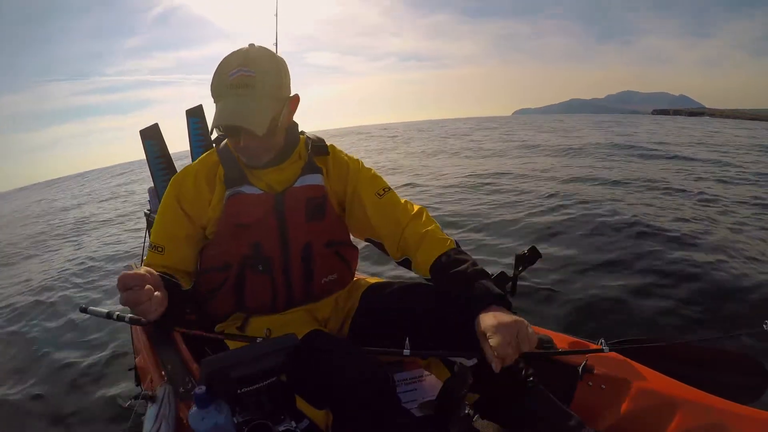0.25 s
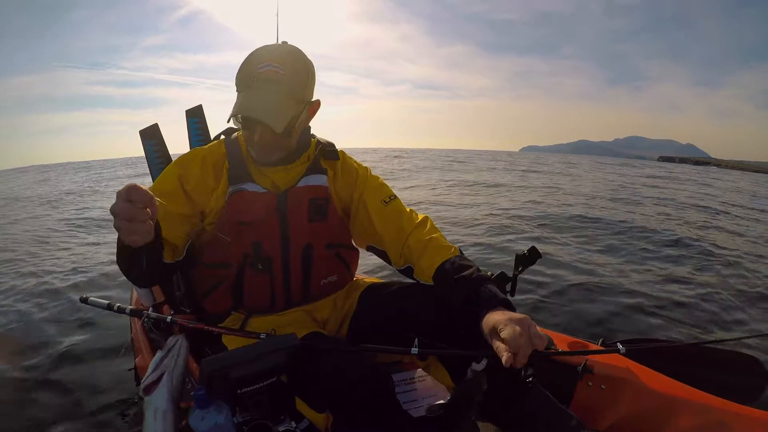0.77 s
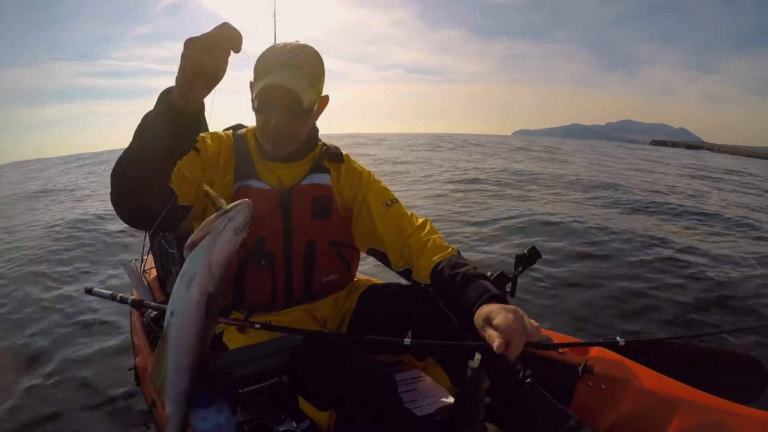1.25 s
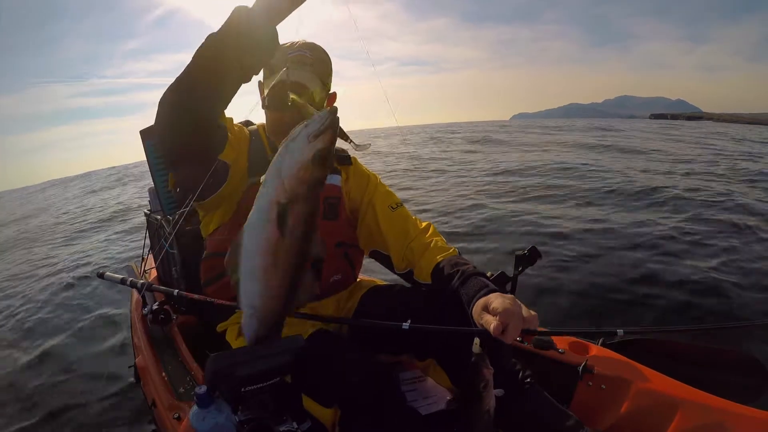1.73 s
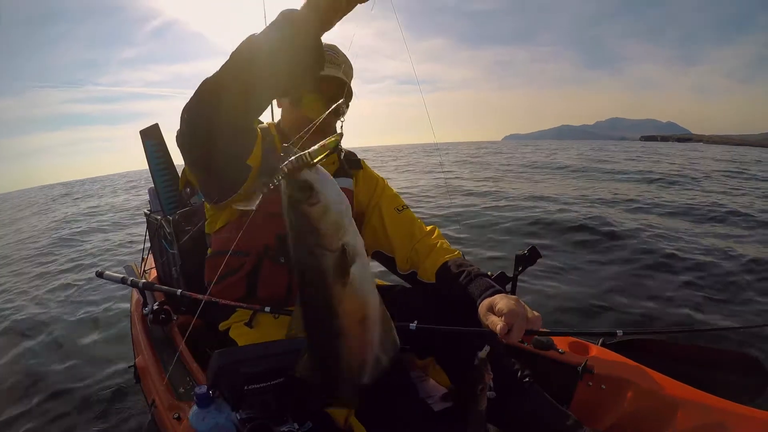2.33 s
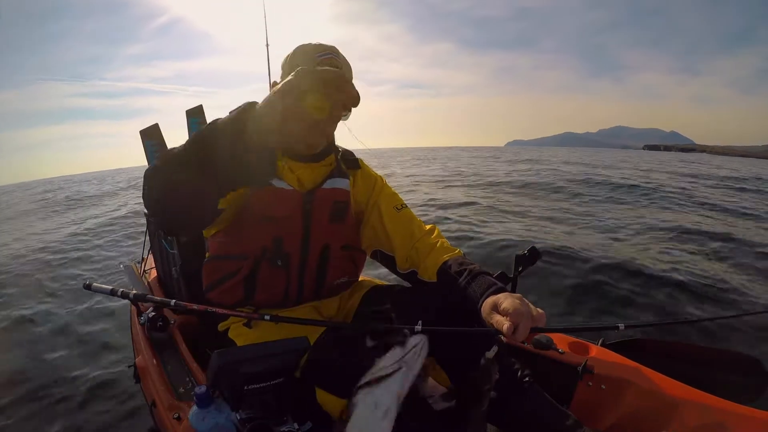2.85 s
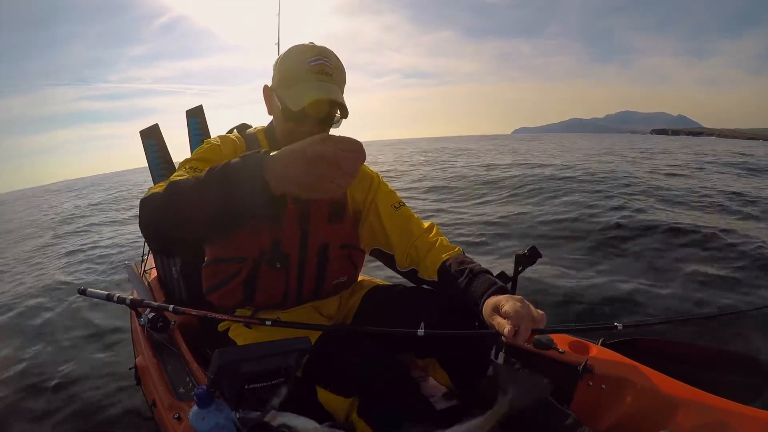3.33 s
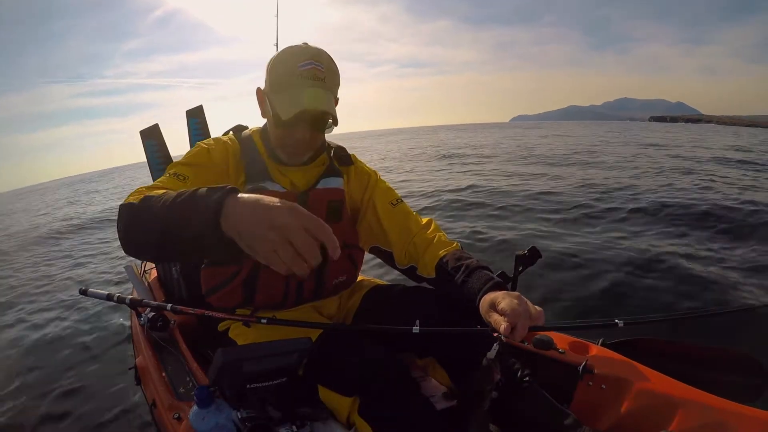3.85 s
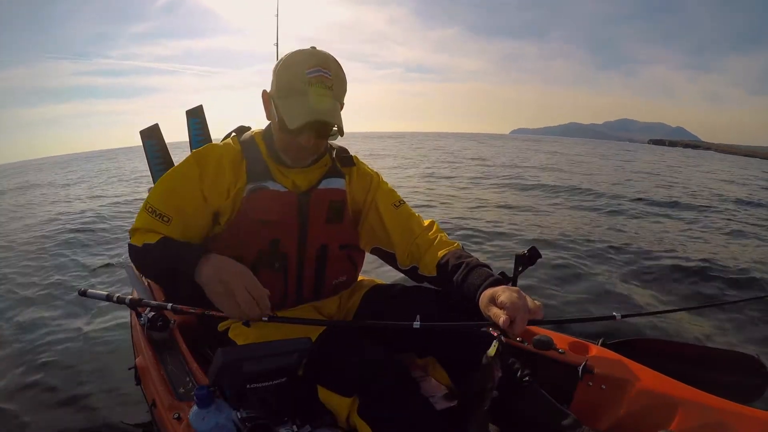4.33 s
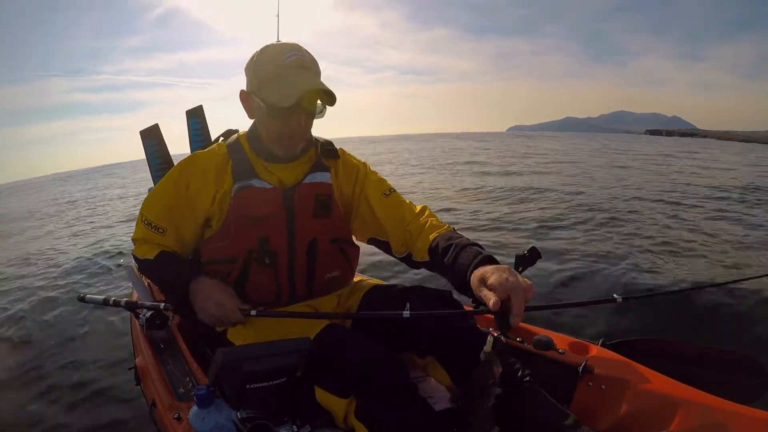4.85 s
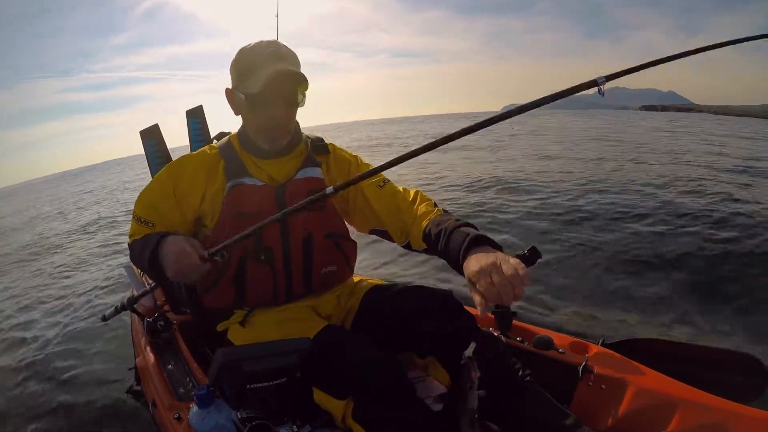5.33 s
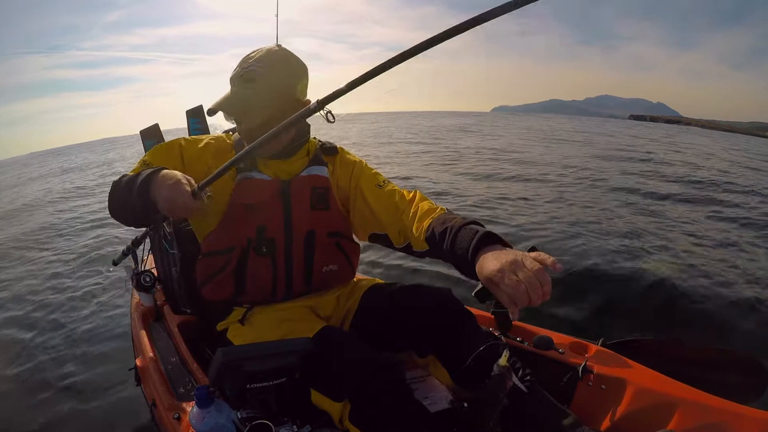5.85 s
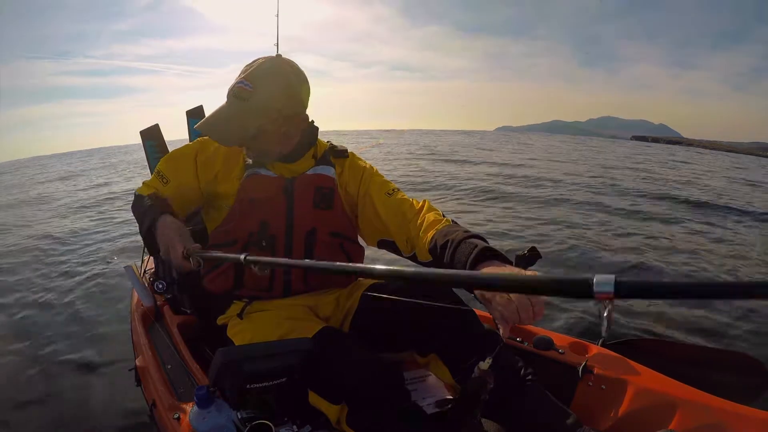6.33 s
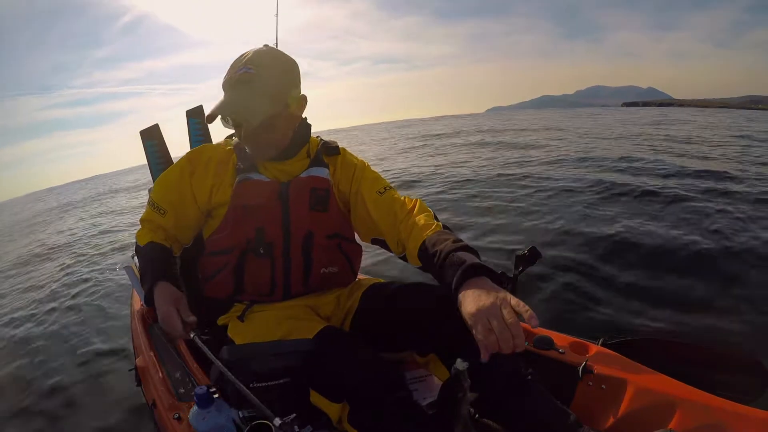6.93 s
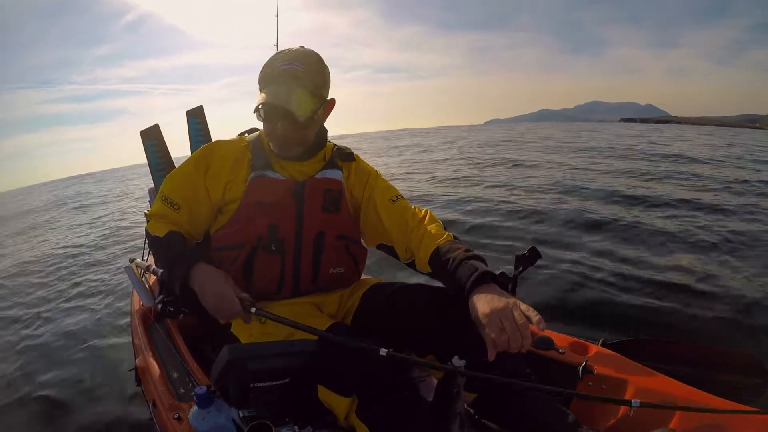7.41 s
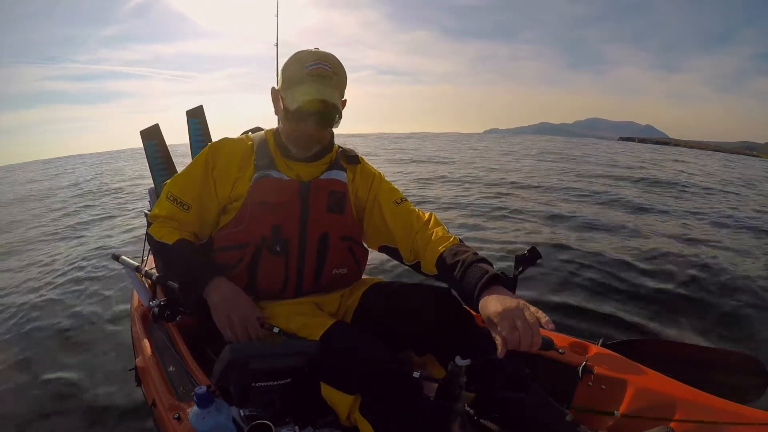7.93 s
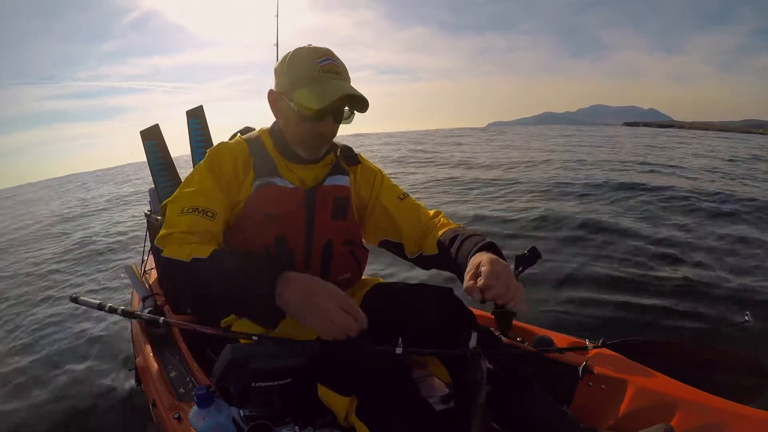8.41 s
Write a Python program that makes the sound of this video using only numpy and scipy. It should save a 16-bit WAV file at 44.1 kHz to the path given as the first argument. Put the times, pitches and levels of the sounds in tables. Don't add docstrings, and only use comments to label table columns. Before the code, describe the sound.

Hollow water slaps and low panel thumps dominate, heard through the boat's own body. Tiny metallic ticks, dry knocks and short scrapes come from handled tackle, with faint sleeve rustle. Activity is dense at first, sinks to soft gurgles near two seconds, bursts at about three, eases, then grows busy from five seconds to the end. Low swell rumble and thin steady hiss lie beneath.

```python
import sys
import numpy as np
from scipy import signal
from scipy.fft import rfft, irfft
from scipy.io import wavfile
from scipy.ndimage import uniform_filter1d, minimum_filter1d

SR = 44100
rng = np.random.default_rng(int(sys.argv[2]) if len(sys.argv) > 2 else 0)


def pcm_store(signal):
    levels = np.round(np.clip(np.atleast_2d(signal), -1, 1) * 32767)
    wavfile.write(sys.argv[1], SR, levels.astype(np.int16).T)


def attenuation_scalar(level_db):
    decades = np.asarray(level_db, float) / 20
    return 10 ** decades


N = 382347

# frequency in Hz, width in Hz, level in dB, left minus right in dB,
# lead of the right port in rad.
KEEL_MODES = [(30, 24, -15, 2, .4), (48.3, 11, -8, -3.5, 1.9), (62.8, 15, 2.5, -3, 0.94),
              (82.5, 25.5, -0.5, 2.5, 1.72)]
# frequency in Hz, width in Hz, level in dB, left minus right in dB,
# lead of the right port in rad.
HULL_MODES = [(139.5, 17, 5, 4.5, 1.92), (170, 27, -4.5, 5, 1.4), (207, 22.7, 3.5, 2, 2.15),
              (261, 21, 2.5, -1.5, 1.8), (308, 28.4, -7.5, -2, 1.33), (372.6, 41, -7.5, -6.5, 0.67),
              (432.7, 51, -8.5, 2.5, 0.51), (501, 30, -18, -7, 0.28)]
# frequency in Hz, width in Hz, level in dB, left minus right in dB,
# lead of the right port in rad.
DECK_MODES = [(577, 174, 3.5, -3.5, 1.71), (716, 77, -20.5, 6, -1.5), (1020, 170, 6, -0.5, -2.5),
              (1210, 85, -2, 4, -2.5), (1488, 220, -3, -1.5, -2), (1900, 167, -1.5, -1.5, 1.08),
              (2300, 390, -35, 2, -20)]
# frequency in Hz, width in Hz, level in dB, left minus right in dB,
# lead of the right port in rad.
TACKLE_MODES = [(3000, 5800, -1.5, -2, -0.5), (4100, 640, 0.5, -1, -8), (5000, 1020, 1.5, 0, -6),
                (6270, 610, 4.5, 8.5, 2), (7110, 440, -1.5, -15, -1), (8730, 3400, -3, -29.5, -3),
                (10400, 1600, -6, -42.5, -9), (12800, 2200, -19, 0, -7.5)]

# start in seconds, peak in dB, struck pitch in Hz.
SLAPS = [(0.443, -5, 271), (0.737, -26, 280), (0.788, -17, 201), (1.132, -16.5, 236), (1.419, -16.5, 280),
         (2.498, -21.5, 220), (2.75, -6, 250), (2.995, -20.5, 242), (3.397, -15.5, 294), (3.74, -21, 170),
         (3.743, -13.5, 280), (4.691, -19, 353), (5.829, -18.5, 297), (5.961, -9.5, 261),
         (6.246, -5.5, 287), (6.673, -10.5, 207), (6.911, -10, 273), (7.408, -17, 297), (7.651, -19, 188.5),
         (8.111, -12, 451), (8.332, -3.5, 380)]
# start in seconds, peak in dB, struck pitch in Hz.
SLOPS = [(1.312, -18.5, 340), (2.62, -18, 330), (2.7, -13.5, 303), (3.047, -11, 178), (4.03, -16.5, 329),
         (4.317, -17.5, 170), (5.125, -10, 248), (5.591, -12.5, 324), (5.745, -12.5, 260),
         (6.566, -13.5, 284), (6.837, -16, 224), (7.562, -17.5, 170), (7.797, -19, 187),
         (7.827, -11.5, 311)]
# start in seconds, peak in dB, struck pitch in Hz.
FLICKS = [
    (2.545, -15, 357),
    (2.924, -18.5, 199),
    (3.176, -9.5, 234),
    (3.211, -13, 290),
    (3.962, -22.5, 310),
    (4.516, -27.5, 358),
    (7.34, -22, 217),
    (8.31, -7.5, 300),
    (8.6, -13.5, 249),
]
# start in seconds, peak in dB, pitch in Hz.
THUMPS = [
    (2.754, -6.5, 252),
    (3.964, -21.5, 170),
    (5.744, -16, 258),
    (6.249, -9.5, 280),
    (6.672, -9, 209),
    (6.913, -7, 261),
    (7.562, -21, 170),
    (8.336, -6.5, 226),
]
# start in seconds, peak in dB, pitch in Hz.
CRACKS = [(.447, -13, 326), (.478, -17, 480), (1.137, -21, 596), (2.749, -10.5, 503), (3.1, -8, 567),
          (3.1, -5.5, 820), (8.331, -12, 950), (3.101, -8, 1540), (3.215, -9.5, 296), (3.4, -18.5, 465),
          (3.749, -11, 332), (6.911, -13, 550), (8.116, -14.5, 500), (8.332, -4.5, 538)]
# start in seconds, peak in dB, struck pitch in Hz.
LAPS = [(0.057, -9, 273.1), (0.168, -10.5, 253), (0.209, -11.5, 330), (0.244, -17, 281), (0.868, -37, 151),
        (1.344, -16, 267), (1.449, -20, 183), (1.577, -20.5, 231), (1.677, -20, 257), (1.754, -21, 246),
        (1.959, -21.5, 166), (2.074, -36.5, 207), (2.395, -45, 253), (2.846, -28, 166), (2.96, -28, 207),
        (3.634, -26.5, 183), (3.705, -19, 151), (3.846, -38, 355), (3.903, -38, 218), (4.178, -29.5, 336),
        (4.286, -20.5, 150), (4.862, -36, 190), (4.922, -27, 248), (5.179, -17, 153), (5.259, -22, 147),
        (5.309, -34, 151), (5.849, -22, 544), (6.079, -14.5, 189), (6.17, -14, 273), (6.299, -16, 149),
        (6.418, -11, 279), (7.205, -20.5, 207), (7.679, -23, 278), (7.969, -19, 393), (8.069, -39, 216),
        (8.209, -22, 450), (8.228, -23, 196), (8.429, -15.5, 212), (8.459, -17, 171), (8.509, -22, 170),
        (8.572, -21, 218)]
# start in seconds, peak in dB, struck pitch in Hz.
KNOCKS = [(0.472, -33, 930), (1.11, -34, 900), (1.92, -30.5, 1590), (3.399, -22, 643), (4.068, -14, 1490),
          (4.689, -21.5, 1125), (5.961, -29, 725), (6.148, -23.5, 1900), (6.168, -28.5, 1060),
          (6.168, -28.5, 1900), (6.911, -15, 760), (7.792, -16.5, 1820), (8.103, -19, 1030)]
# start in seconds, peak in dB, struck pitch in Hz.
RAPS = [(0.439, -27.5, 1000), (2.547, -25, 1160), (2.748, -15.5, 910), (2.919, -27, 1900),
        (3.056, -15.5, 1890), (3.523, -35.5, 2040), (3.939, -33, 1890), (5.845, -28, 780),
        (5.915, -21.5, 1690), (6.248, -12.5, 1150), (8.33, -10, 990), (8.599, -27, 667),
        (8.627, -25.5, 1105)]
# start in seconds, peak in dB, struck pitch in Hz.
BUMPS = [(0.046, -22, 846), (0.155, -20.5, 726), (1.131, -26.5, 1170), (2.631, -26.5, 1760),
         (3.205, -23, 665), (3.746, -24, 726), (3.742, -28, 1900), (5.126, -24.5, 930), (5.589, -26, 995),
         (6.832, -18, 1696), (7.559, -20, 1520), (7.828, -22.5, 1200), (8.308, -19, 1570)]
# start in seconds, peak in dB, struck pitch in Hz.
DABS = [(0.024, -33.5, 993), (0.102, -22.5, 830), (0.514, -31.5, 1070), (1.194, -38, 1720),
        (1.24, -37, 1020), (1.382, -38, 756), (1.444, -30.5, 1490), (1.56, -34, 1010), (1.599, -34, 1020),
        (1.671, -40, 1010), (1.775, -39, 1010), (1.855, -29.5, 1010), (1.957, -37, 845), (2.709, -26, 961),
        (2.847, -39, 1900), (2.878, -36, 1980), (2.998, -26.5, 935), (3.174, -40, 1600), (3.223, -23, 710),
        (3.326, -41, 714), (3.35, -37, 1650), (3.708, -37.5, 1410), (2.972, -38, 1670), (4.01, -36, 1070),
        (4.031, -33, 1360), (4.133, -35, 720), (4.182, -32.5, 724), (4.322, -39, 1075), (4.451, -36.5, 716),
        (5.094, -38, 896), (5.181, -28, 754), (5.443, -38, 1140), (5.62, -36, 703), (5.741, -41, 720),
        (5.783, -44, 1060), (5.827, -37, 810), (5.899, -36, 1460), (6.401, -28, 750), (6.554, -34.5, 1730),
        (6.567, -32.5, 732), (6.665, -34, 764), (7.34, -34, 1060), (7.386, -36, 1110), (7.403, -29, 1210),
        (7.472, -45, 894), (7.505, -37.5, 1060), (7.625, -31.5, 990), (7.856, -20.5, 1900),
        (7.872, -25, 1850), (7.911, -31, 1070), (7.965, -32, 1210), (8.094, -27.5, 1040),
        (8.209, -30.5, 1050), (8.477, -28.5, 1670), (8.502, -29, 760), (8.547, -29, 1230)]
# start in seconds, peak in dB, struck pitch in Hz.
TICKS = [(0.3681, -13, 7100), (0.576, -31, 9100), (0.638, -22.5, 7640), (0.7268, -22, 7400),
         (1.0148, -17.5, 7300), (1.0459, -24, 7250), (1.1462, -18.5, 7100), (1.1722, -26, 7750),
         (1.268, -21.5, 7700), (2.5473, -33.5, 2520), (2.7752, -33, 7360), (3.084, -27, 5860),
         (6.8323, -15, 3000), (7.7917, -15.5, 2490), (7.8224, -12, 7600)]
# start in seconds, peak in dB, struck pitch in Hz.
CLINKS = [(1.7926, -27, 5920), (3.1005, -24.5, 2800), (3.523, -34, 8500), (3.7407, -31.5, 3800),
          (5.3062, -36.5, 3800), (5.441, -19, 6500), (6.2985, -31.5, 3730), (7.5596, -19, 4430),
          (7.7746, -31, 4840), (7.8421, -14.5, 7840), (8.101, -28, 6700), (8.208, -34, 5070),
          (8.304, -37, 5960)]
# start in seconds, peak in dB, struck pitch in Hz.
CLACKS = [(0.5128, -30, 4300), (1.92, -27, 4000), (3.9375, -36, 2620), (4.0612, -30, 2500),
          (5.588, -28.5, 4030), (5.619, -27.5, 3870), (5.9627, -19.5, 6700), (6.1461, -10, 5000),
          (6.1682, -16, 5030), (6.2462, -3.5, 5645), (6.2726, -28, 5940), (6.5535, -32.5, 4200),
          (7.4035, -33, 5600), (8.309, -23.5, 6400), (8.4771, -32, 4100)]
# start in seconds, peak in dB, pitch in Hz.
SPECKS = [(.035, -35, 8800), (0.0717, -39, 6900), (.44, -30.5, 4020), (.604, -39, 9100), (.738, -32, 7500),
          (2.75, -29.5, 5000), (2.786, -45, 4500), (2.955, -40.5, 3300), (3.175, -47, 5500),
          (4.674, -35.5, 2500), (7.47, -33, 4460), (7.34, -37, 2600), (1.0582, -26, 7400),
          (1.311, -36, 7500), (1.427, -29.5, 3900), (2.1905, -38, 4080), (2.36, -38, 4700),
          (2.9066, -40, 3330), (8.549, -31.5, 3930), (3.233, -40, 6260), (3.354, -50, 3700),
          (3.615, -38, 5000), (3.635, -38, 5000), (4.12, -37.5, 7360), (4.5987, -31, 4570),
          (5.374, -36.5, 3990), (5.533, -36, 5990), (6.4142, -30.5, 3200), (6.689, -43, 2540),
          (8.5, -33, 3700), (8.628, -37, 7600)]
# start in seconds, peak in dB, pitch in Hz, length in ms.
DRAGS = [
    (.03, -12, 441, 170),
    (.46, -13, 214, 78.5),
    (1.4, -30, 269, 490),
    (1.6, -23.5, 183.3, 184),
    (5.08, -8, 259, 81),
    (6.26, -17.5, 151, 90),
    (8.325, -15.5, 500, 33.4),
    (6.04, -15, 420, 59),
    (3.03, -11, 291, 72),
]
# start in seconds, peak in dB, pitch in Hz, length in ms.
SCRAPES = [
    (.0, -21, 900, 127),
    (.15, -30, 877, 40),
    (3.05, -19, 816, 63),
    (7.6, -36, 1070, 69),
    (4.035, -27, 1200, 71),
    (6.4, -30, 1500, 28),
    (7.83, -27.5, 1290, 76),
    (7.955, -24.5, 1234, 74),
]
# start in seconds, peak in dB, pitch in Hz, length in ms, treble in dB.
RATTLES = [
    (3.083, -28.5, 5770, 25, -14),
    (3.735, -31.5, 6940, 23, -10),
    (4.05, -36, 3900, 50, -15),
    (6.37, -31.5, 3900, 42, -27),
    (7.843, -23, 3300, 50.5, -17),
    (7.953, -28, 3000, 85, -14),
    (8.295, -28, 3920, 53, -21),
    (3.585, -47, 7900, 20, -12),
]
# start in seconds, peak in dB, pitch in Hz, length in ms.
SLEEVES = [
    (1.1, -41.5, 5000, 530),
    (2.6, -39.5, 5000, 140),
    (4.27, -38.5, 5540, 296),
    (4.54, -38.5, 5000, 110),
    (.0, -35.5, 5000, 65),
    (5.8, -36.5, 5500, 450),
    (7.35, -41, 5000, 520),
    (8.1, -36.5, 5740, 323),
    (8.45, -41.5, 4400, 138),
]
# start in seconds, peak in dB, pitch in Hz, length in ms.
GURGLES = [(.09, -11.5, 455, 55), (1.6, -21, 248, 230), (1.85, -24.5, 185, 130), (1.59, -37, 670, 47),
           (.045, -11, 270, 61), (.045, -17, 450, 45), (3.7, -16, 62, 190), (2.755, -13, 210, 45),
           (6.675, -11, 208, 75), (6.25, -13, 280, 50), (6.27, -16, 149.4, 81), (5.2, -24.5, 154.2, 120),
           (1.66, -44, 1000, 45), (4.96, -38, 1100, 21)]
# time in seconds, level in dB.
SEA = [(0, -25.5), (1.0, -34.5), (2.0, -30.5), (2.2, -41.5), (2.44, -46.5), (2.5, -39.5), (3.5, -27),
       (3.59, -44), (3.7, -39), (4.8, -39), (5.15, -31.5), (5.45, -31.5), (5.55, -46), (5.63, -33),
       (5.96, -36.5), (6.5, -30), (8.0, -32), (8.67, -32.5)]
# time in seconds, peak in dB.
HEAVES = [(0, -13), (.52, -24), (1.29, -23.5), (3.061, -16.5), (3.78, -21.5), (4.08, -22), (4.35, -20),
          (4.91, -30.5), (6.35, -23.5), (6.87, -15.5), (7.24, -20.5), (7.72, -23.5), (8.5, -25)]
# time in seconds, level in dB.
WASH = [(0, -16.5), (.22, -25), (.28, -34), (1.05, -43), (1.33, -26), (1.93, -28), (2.1, -40),
        (3.05, -26.5), (3.14, -39), (4.6, -41.5), (5.2, -29), (5.54, -41.5), (6.3, -24.5), (7.04, -41),
        (7.4, -31.5), (8.04, -36), (8.2, -25), (8.67, -24)]
# time in seconds, peak in dB.
JOLTS = [
    (.58, -14.5),
    (0.889, -19),
    (0.989, -22),
    (1.093, -22.5),
    (4.571, -23.5),
    (4.784, -23),
]
# start in seconds, drop in dB, recovery in seconds.
DUCKS = [
    (0, 4.5, 1),
    (.44, 3, 0.22),
    (3.111, 21, 0.48),
    (3.75, 6.5, 0.26),
    (6.92, 8.5, 0.26),
    (8.34, 6.5, 0.98),
]
# frequency in Hz, density in dB per Hz.
HISS = [(350, -36), (600, -8), (4500, -10.5), (7800, -11.5), (10700, -17.5), (13300, -25.5), (14000, -30),
        (15500, -50)]


def ring(drive, modes, pan_db=0.):
    out = 0
    for x, (hz, width, db, side_db, lead) in zip(drive, modes):
        pole = np.exp((2j * hz - width) * np.pi / SR)
        gain = attenuation_scalar(db) * np.sqrt(width) * (1 - abs(pole)) ** .5
        z = signal.lfilter([gain], [1, -pole], x)
        shade_db = side_db + pan_db * min(0.85 * (hz / 7500) ** 5.7, 1.5)
        ports = attenuation_scalar(np.array([[1], [-1]]) * shade_db / 2) * np.exp(.5j * lead * np.array([[-1], [1]]))
        out = out + (ports * z).imag
    return out


def band(x, low_hz, high_hz):
    return signal.sosfilt(signal.butter(3, [low_hz, high_hz], "band", fs=SR, output="sos"), x)


def tap(rise, tail):
    def push(ms, length):
        decay = np.exp(-ms / length) + tail * np.exp(-ms / (5 * length))
        return decay * -np.expm1(-ms / (rise * length))
    return push


def slide(grit_db, edge, fade, step):
    def push(ms, length):
        grit = np.repeat(rng.exponential(size=len(ms) // step + 1), step)[:len(ms)]
        swell = np.sin(np.pi * np.clip(ms / length, 0, 1)) ** edge
        return swell * np.exp(-fade * ms / length) * attenuation_scalar(grit_db * grit)
    return push


def blows(events, modes, push, reach, own_db, own_q, low_hz, high_hz, size, crack=0):
    usual = (1.5, -22)
    out, ms, body = np.zeros((2, N + size)), np.arange(size) * 1000 / SR, np.array(modes)
    treble = 1 / (1 + (8300 / (np.fft.rfftfreq(size, 1 / SR) + 1)) ** 8)
    for s, db, hz, *rest in events:
        length, treble_db = *rest, *usual[len(rest):]
        closest = np.abs(body[:, 0] - hz).argmin()
        rings = np.vstack([body, [hz, hz / own_q, own_db, *body[closest, 3:]]])
        near = 1 / (1 + (np.log2(rings[:, :1] / hz) / reach) ** 2) ** 2
        noise = rng.standard_normal((len(rings) + 1, size))
        drive = near * push(ms, max(length, .3)) * (noise[1:] + noise[0])
        contact = crack * np.sqrt(length * SR / 1000) * near[:, 0]
        drive[:, 4] += contact * (1 + 0.29 * noise[1:, 0])
        pan_db = -.45 * (treble_db + 9.0)
        hit = band(ring(drive, rings, pan_db), low_hz, high_hz)
        hit = irfft(rfft(hit) * attenuation_scalar((treble_db + 11.0) * treble), size)
        start = int(s * SR)
        out[:, start:start + size] += hit * attenuation_scalar(db) / np.abs(hit.mean(axis=0)).max()
    return out[:, :N]


def alike_in(rows, *shared):
    return [(*row, *shared) for row in rows]


def hull_blows():
    struck = alike_in(FLICKS, 2.1) + alike_in(SLAPS, 7.2) + alike_in(SLOPS, 21)
    slaps = blows(struck, HULL_MODES, tap(0.25, 0.19), crack=0.97, reach=0.71, own_db=2.0, own_q=10.5,
                  low_hz=103.5, high_hz=610, size=7000)
    thumps = blows(alike_in(THUMPS, 2.2), HULL_MODES, tap(0.6, 0.03), crack=3.3, reach=0.34,
                   own_db=12, own_q=12.0, low_hz=101, high_hz=500, size=6000)
    cracks = blows(alike_in(CRACKS, 2), HULL_MODES + DECK_MODES, tap(0.5, 0.01), crack=2.3, reach=0.3,
                   own_db=22, own_q=4.9, low_hz=153, high_hz=2600, size=1800)
    laps = blows(alike_in(LAPS, 9.6), HULL_MODES, tap(0.34, 0.093), crack=0.67, reach=0.54,
                 own_db=3.5, own_q=14.6, low_hz=97.5, high_hz=640, size=5000)
    return slaps + thumps + cracks + laps


def deck_knocks():
    struck = alike_in(RAPS, 3.5) + alike_in(KNOCKS, 6.5) + alike_in(BUMPS, 11)
    knocks = blows(struck, DECK_MODES, tap(0.28, 0.037), crack=0.46, reach=1.0, own_db=6.5, own_q=14.2,
                   low_hz=405, high_hz=2200, size=3500)
    dabs = blows(alike_in(DABS, 5.9), DECK_MODES, tap(0.4, 0.018), crack=0.39, reach=1.0,
                 own_db=4.0, own_q=12, low_hz=450, high_hz=2500, size=1800)
    return knocks + dabs


def tackle_ticks():
    snaps = alike_in(TICKS, 3.03, -14) + alike_in(CLINKS, 3.03, -22) + alike_in(CLACKS, 3.03, -30.5)
    return blows(snaps + SPECKS, TACKLE_MODES, tap(0.13, 0.0092), crack=0.23, reach=1.5, own_db=9,
                 own_q=21.7, low_hz=2040, high_hz=15100, size=1800)


def rubbing():
    drags = blows(DRAGS, HULL_MODES, slide(1.57, 0.17, 0.39, step=300), reach=0.7, own_db=4.5, own_q=16.4,
                  low_hz=92, high_hz=725, size=14000)
    scrapes = blows(SCRAPES, DECK_MODES, slide(2.1, 0.12, 0.28, step=90), reach=0.91, own_db=4.5, own_q=4.7,
                    low_hz=434, high_hz=2500, size=6000)
    rattles = blows(RATTLES, TACKLE_MODES, slide(2.6, 0.42, 0.7, step=90), reach=1.0, own_db=6.0, own_q=40,
                    low_hz=2150, high_hz=13200, size=5000)
    sleeves = blows(SLEEVES, TACKLE_MODES, slide(1.47, 0.56, 0.092, step=50), reach=3.0, own_db=-3.0,
                    own_q=2.2, low_hz=3000, high_hz=8800, size=22000)
    return drags + scrapes + rattles + sleeves


def gurgles(waver, sag):
    out, body = np.zeros((2, N)), np.array(KEEL_MODES + HULL_MODES + DECK_MODES)
    for s, db, hz, length in GURGLES:
        u = np.linspace(0, 1, num=int(length * SR / 1000))
        slow = np.interp(u, np.linspace(0, 1, num=6), rng.standard_normal(size=6))
        pitch = hz * (1 + waver * slow - sag * (u - .5))
        turn = 2 * np.pi * np.cumsum(pitch) / SR
        side_db, lead = body[np.abs(body[:, 0] - hz).argmin(), 3:]
        side = np.array([[.5], [-.5]])
        swell = np.sin(np.pi * u ** 0.7) * attenuation_scalar(2.6 * slow[::-1])
        tone = attenuation_scalar(side * side_db) * np.sin(turn - side * lead) * swell
        start = int(s * SR)
        out[:, start:start + len(u)] += tone * attenuation_scalar(db) / np.abs(tone.mean(axis=0)).max()
    return out


def walk(rate):
    k = int(SR / rate)
    return 2.01 * uniform_filter1d(np.repeat(rng.standard_normal(N // k + 1), k), k)[:N]


def surges(curve, events, rise_db_s, fall_db_s):
    t = np.linspace(0, N / SR, num=2000)
    late = t - np.array(events)[:, :1]
    peaks_db = np.array(events)[:, 1:2] - np.where(late > 0, fall_db_s * late, -rise_db_s * late)
    total = attenuation_scalar(np.interp(t, *np.transpose(curve))) ** 2 + (attenuation_scalar(peaks_db) ** 2).sum(axis=0)
    return np.interp(np.arange(N) / SR, t, 10 * np.log10(total))


def steady(modes, level_db, alike, lumps_db, rate, low_hz, high_hz):
    shared = walk(rate)
    lumps = np.array([attenuation_scalar(lumps_db * (shared + 0.71 * walk(1.7 * rate))) for _ in modes])
    common = ring(lumps * rng.standard_normal((len(modes), N)), modes)
    apart = ring(lumps * rng.standard_normal((len(modes), N)), modes) * np.array([[1], [-1]])
    body = band(alike * common + np.sqrt(1 - alike ** 2) * apart, low_hz, high_hz)
    return body * attenuation_scalar(level_db) / np.std(body.mean(axis=0))


def moving_water(duck_db):
    struck = SLAPS + SLOPS + FLICKS
    heave_db = surges(SEA, HEAVES, rise_db_s=125, fall_db_s=106)
    heave = steady(KEEL_MODES, heave_db, alike=0.96, lumps_db=1.5, rate=9, low_hz=15.3, high_hz=117)
    sloshes = [(s + 0.009, db - 9) for s, db, _ in struck]
    wash_db = surges(WASH, sloshes, rise_db_s=902, fall_db_s=287) - 1.0
    wash = steady(HULL_MODES, wash_db, alike=0.96, lumps_db=3, rate=18, low_hz=86, high_hz=627)
    sprays = [(s, db - 11.5) for s, db, _ in struck]
    spray_db = surges(WASH, sprays, rise_db_s=902, fall_db_s=604)
    rub_db = 0.57 * spray_db - 34.0 - 0.28 * duck_db
    rub = steady(DECK_MODES, rub_db, alike=1.0, lumps_db=3.0, rate=45, low_hz=545, high_hz=1820)
    return heave + wash + rub


def jolts(width_s):
    t = np.arange(N) / SR
    out = np.zeros(N)
    for s, db in JOLTS:
        u = (t - s) / width_s
        out -= attenuation_scalar(db) * u * np.exp(.5 - .5 * u ** 2)
    return out


def duck():
    t = np.arange(N) / SR
    return sum(drop * np.exp(-np.abs(t - s) / back) * (t > s) for s, drop, back in DUCKS)


def hiss(level_db, alike, duck_db):
    hz, db = np.transpose(HISS)
    colour = attenuation_scalar(np.interp(np.log(np.fft.rfftfreq(N, 1 / SR) + 1), np.log(hz), db))
    mid, left, right = irfft(rfft(rng.standard_normal((3, N))) * colour, N)
    return (alike * mid + np.array([left, right])) / np.std(left) * attenuation_scalar(level_db - duck_db)


def scene():
    duck_db = duck()
    contacts = hull_blows() + deck_knocks() + tackle_ticks() + rubbing()
    water = gurgles(waver=.015, sag=0.023) + moving_water(duck_db)
    return contacts + water + jolts(width_s=0.0022) + hiss(-54.5, alike=0.72, duck_db=duck_db)


def band_limit(x):
    return signal.sosfilt(signal.butter(12, 16470, fs=SR, output="sos"), x)


def record(dry):
    cut = signal.sosfilt(signal.ellip(5, .2, 50, 15000, fs=SR, output="sos"), dry)
    peak = np.abs(cut).max(axis=0) + 1e-9
    room = minimum_filter1d(np.minimum(1, .97 / peak), size=441)
    return band_limit(cut * uniform_filter1d(room, size=441))


dry = scene()
out = record(dry)
pcm_store(out)
```